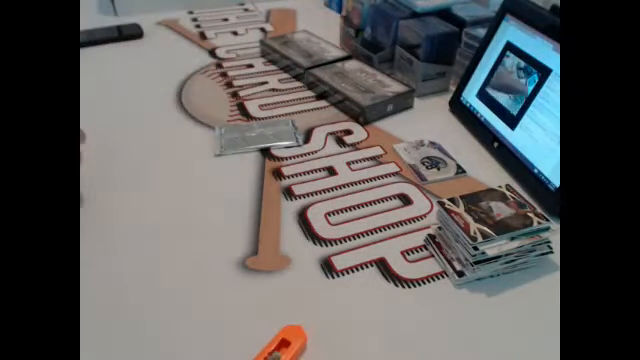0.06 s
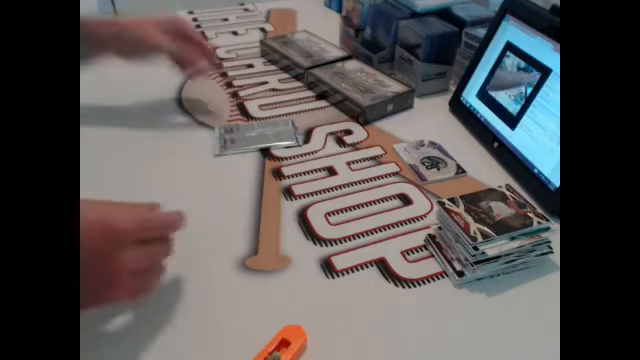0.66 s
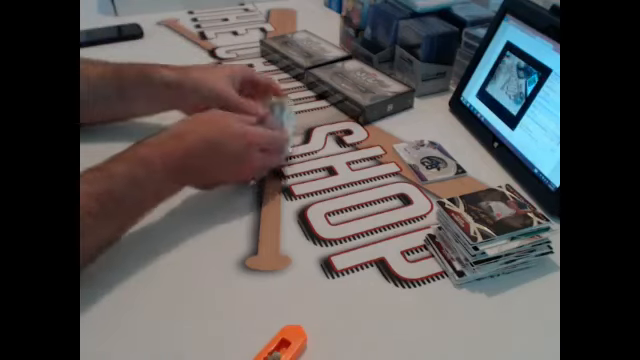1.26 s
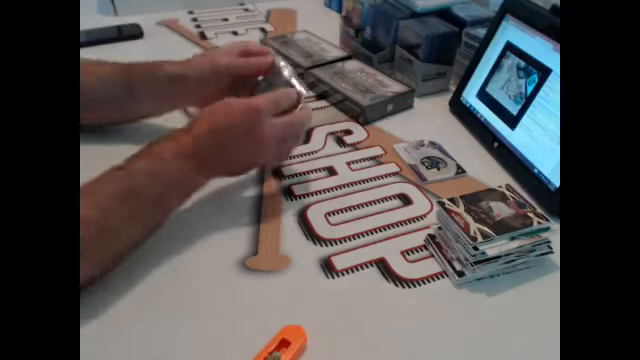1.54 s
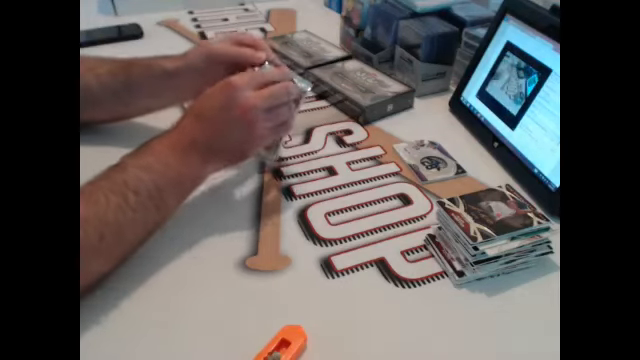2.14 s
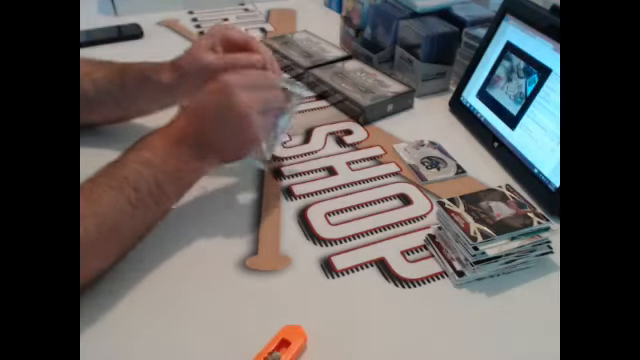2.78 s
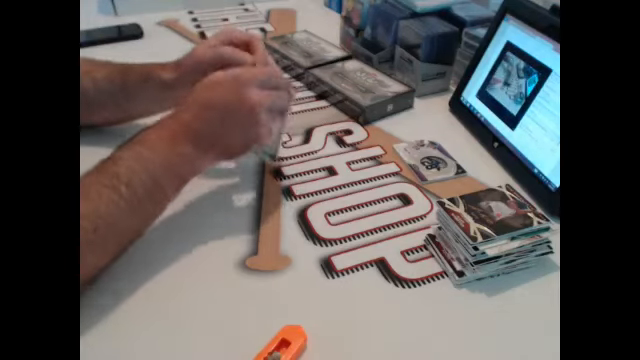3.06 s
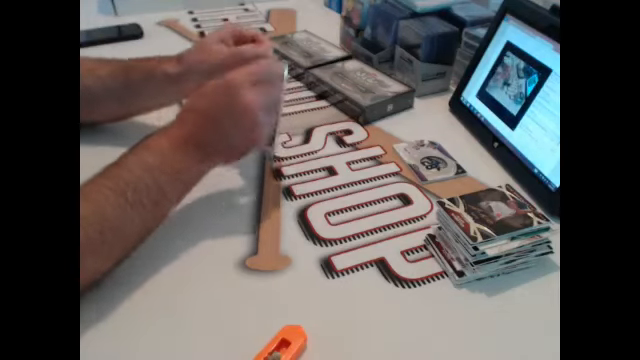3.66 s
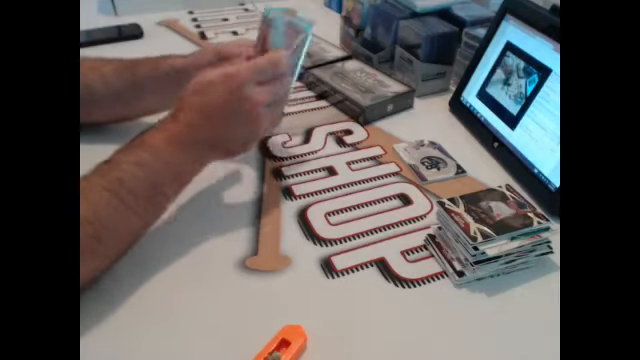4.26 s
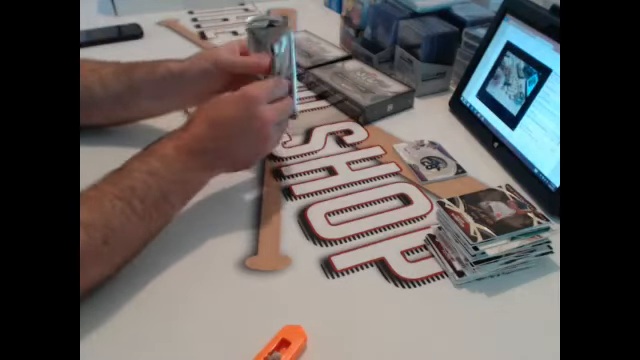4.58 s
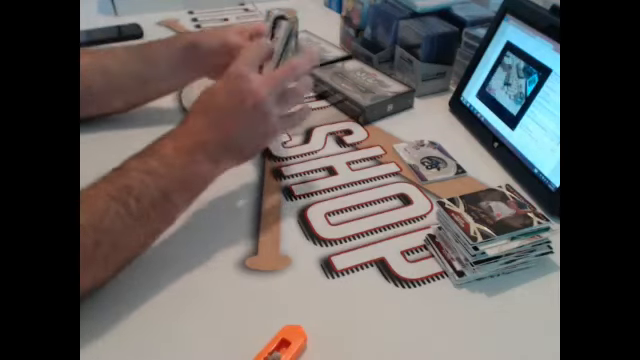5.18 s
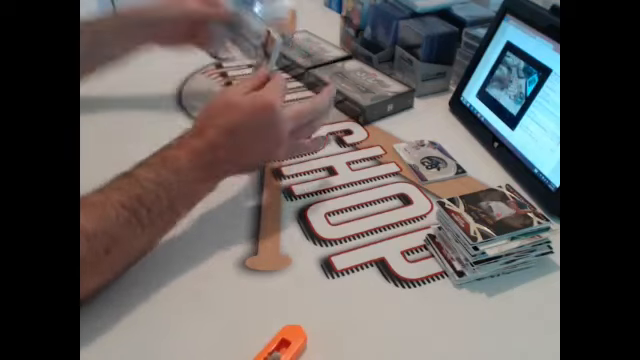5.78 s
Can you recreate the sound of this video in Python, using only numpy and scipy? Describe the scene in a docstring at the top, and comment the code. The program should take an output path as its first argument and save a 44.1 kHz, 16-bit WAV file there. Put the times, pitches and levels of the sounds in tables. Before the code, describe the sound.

At the very start, something lands a little way off with a loud, hollow knock that rattles and rebounds for about a third of a second. From 0.9 seconds, close to the microphone, hands pick up a foil card pack with faint ticks, crease snaps and muffled rubbing. Around 2.7 seconds comes a first short rip with sharper crackles, followed by scattered crinkling. The foil tears again from 3.6 seconds, and the seam opens with a sharp, hollow pop at about 3.8. Crisp snaps and crinkles thicken as the wrapper is peeled back, peaking near 5 seconds with another rip and a dull crunch as the pack buckles. A soft slide follows at about 5.6, then a few last light ticks. A low, steady fan with a faint thin whine runs throughout, and the small, bare room adds a short reverberation.

```python
"""A table in a small, bare room. A little way off, something lands with a hollow, rattling knock.
Up close, hands pick up a foil pack of trading cards, pinch it, tear the seam and peel off the wrapper.
Creases snap and ring, the foil crinkles and rubs on the cards, the seam rips in tiny slips and pops,
and the pack buckles with a dull crunch. A steady fan is the bed; a small desk microphone hears it all."""
import sys
import numpy as np
from scipy import signal
from scipy.fft import rfft, irfft
from scipy.io import wavfile

SR = 44100
rng = np.random.default_rng(int(sys.argv[2]) if len(sys.argv) > 2 else 0)


def inscribe(sig):
    """Save sig as 16-bit PCM at rate SR to the path in sys.argv[1].

    A 1-D sig is mono; a 2-D sig holds one channel per row.
    Samples are clipped to [-1, 1] before scaling.
    """
    pcm = np.round(np.clip(np.atleast_2d(sig).T, -1, 1) * 32767)
    wavfile.write(sys.argv[1], SR, pcm.astype(np.int16))


N = 261500

# creases snapping through: t/s, relative level/dB, ring f/Hz, rustle against the snap/dB
CREASE_SNAPS = [(0.8913, -33.5, 2580, -1.5), (0.9907, -37.5, 2250, -1.5), (1.2292, -41, 1620, -22),
                (1.352, -52, 3770, -2), (1.432, -44, 3900, -12), (1.763, -36.5, 3400, -6.5),
                (1.818, -43, 1810, -18), (1.948, -45.5, 4850, -13), (2.0249, -32, 4360, -3),
                (2.0891, -29, 3040, -1), (2.2756, -40, 3200, 1.5), (2.376, -41, 3700, -11),
                (2.4226, -36, 3390, -7.5), (2.5447, -41, 3280, -4), (2.6212, -37.5, 3450, -7),
                (2.658, -29, 4820, -18), (2.7281, -21, 7000, -12), (2.74, -28, 1920, -20),
                (2.7531, -23.5, 4900, -25), (2.781, -31.5, 1880, 3), (2.8011, -30, 3030, -10),
                (2.812, -29, 2270, -11), (2.8708, -38, 3020, -6), (3.0013, -36, 1270, -8),
                (3.0092, -37.5, 4400, 3), (3.042, -29, 3280, -3), (3.063, -28.5, 4350, -14),
                (3.1163, -28, 4100, -8), (3.208, -39, 3900, -3), (3.263, -39.5, 4570, -23),
                (3.3108, -39, 3870, -24), (3.418, -37, 3300, -5), (3.4607, -33.5, 4660, -7),
                (3.5076, -31, 2160, -3.5), (3.542, -28, 5400, -7), (3.5989, -25.5, 7100, -16),
                (3.6286, -32, 5000, -14), (3.663, -28.5, 2360, -4), (3.756, -28, 3040, 1),
                (3.78, -17, 3010, -10.5), (3.8243, -20, 4230, -21), (3.9562, -39, 4300, -10),
                (4.0009, -29.5, 3170, -16), (4.1392, -33.5, 5120, 1), (4.144, -26, 2210, -11),
                (4.249, -36, 7100, 5), (4.269, -28, 3780, -23), (4.3239, -36.5, 3330, -20),
                (4.3911, -28.5, 3000, -16), (4.424, -44, 6250, -16), (4.437, -32, 3430, -20),
                (4.471, -36, 2180, -16), (4.5052, -37.5, 4200, -17), (4.5391, -30.5, 2130, -10),
                (4.578, -26.5, 3230, -22), (4.5852, -25.5, 3290, -12), (4.615, -20, 3220, -7),
                (4.6228, -23, 3180, -19), (4.6584, -25.5, 4260, 0), (4.7171, -27, 1680, -3),
                (4.729, -20.5, 1720, -13), (4.7473, -21.5, 3300, -10), (4.8064, -40, 2820, -22),
                (4.8612, -27.5, 2470, 2), (4.9064, -22, 3240, -2), (4.9193, -28.5, 6900, -5),
                (4.9368, -27, 2220, -1), (4.963, -20, 6400, 4.5), (4.9788, -17.5, 2300, -9.5),
                (5.0048, -18, 5760, -5.5), (5.0979, -26, 3030, 1), (5.134, -39, 2480, -18),
                (5.2804, -28.5, 3400, -1), (5.3413, -33, 1620, -9), (5.3619, -27.5, 4420, -17),
                (5.5574, -37, 1350, -8), (5.656, -33.5, 1990, -17), (5.888, -42.5, 1690, -7),
                (5.912, -42, 2960, -5)]
# the foil's bright tone colour: f/Hz, level/dB
FOIL_EQ = [(180, -29), (300, -10), (402, -19.5), (469, -6), (511, -11.5), (777, -5), (1010, -10),
           (1590, -2), (2740, -5), (3190, -3), (3720, -6), (7090, -11.5), (8500, -22.5), (11000, -45),
           (18700, -120)]
# fingers squeezing or pulling the foil: t/s, length/s, relative crinkle level/dB, relative rub level/dB
SQUEEZES = [(0.915, 0.12, -49.5, -42), (1.139, 0.1, -50.5, -35), (1.274, 0.035, -50, -40),
            (1.722, 0.16, -52.5, -44), (1.991, 0.043, -38.5, -48), (2.714, .02, -27.5, -30),
            (2.743, .075, -28.5, -43), (2.83, 0.055, -35, -56), (2.999, 0.057, -44, -34.5),
            (3.187, .19, -48.5, -50), (3.44, 0.13, -44.5, -40), (3.64, 0.15, -25, -40),
            (3.7, 0.047, -23, -35.5), (3.79, .04, -29, -32), (3.947, .06, -40, -53),
            (4.104, .025, -39, -51), (4.135, 0.032, -34, -34.5), (4.237, 0.034, -36, -37),
            (4.388, 0.015, -26, -37), (4.43, 0.13, -41, -50), (4.548, 0.048, -31, -35.5),
            (4.608, 0.045, -30.5, -50), (4.704, 0.054, -26, -32.5), (4.76, .04, -38, -47),
            (4.858, 0.018, -40, -40), (4.893, .055, -30, -44), (4.953, 0.041, -24.5, -21),
            (5.023, 0.037, -42, -31.5), (5.1, .06, -49, -42), (5.259, 0.023, -33, -33),
            (5.563, .11, -43, -41.5)]
# foil rubbing on the cards, a muffled colour: f/Hz, level/dB
RUB_EQ = [(150, -22.5), (500, 6.0), (1100, 3.5), (1700, -5.0), (4000, -34.5)]
# the seam tearing and the wrapper sliding: t/s, length/s, relative level/dB, start f/Hz, end f/Hz
TEARS = [(2.735, 0.091, -38.5, 1870, 2060), (2.829, 0.082, -43, 2200, 2120), (3.645, 0.11, -39, 2450, 1900),
         (3.707, 0.062, -44, 1920, 1650), (4.707, .06, -39, 1660, 1600), (4.902, 0.059, -31.5, 2010, 1290),
         (5.545, 0.17, -45.5, 2200, 1920)]
# the whole pack flexing or bumping: t/s, relative level/dB, decay/s, ring f/Hz, ring against crunch/dB
PACK_FLEXES = [(0.892, -37, .008, 1200, 14.5), (2.727, -45, .02, 1250, -10), (3.045, -41, .014, 720, 5),
               (3.826, -42.5, 0.013, 1210, 22.5), (4.73, -40, 0.023, 1590, 8),
               (4.793, -39, 0.0071, 597, -9), (4.944, -33.5, 0.015, 1270, 13.5),
               (4.963, -17, 0.024, 734, 4), (4.967, -28.5, 0.027, 424, 10), (4.98, -23.5, 0.017, 720, 1.5),
               (5.002, -29, 0.021, 1200, 9), (5.064, -35.5, 0.015, 760, 6.5),
               (5.097, -29.5, 0.015, 1090, 1.5)]
# the colour of the pack's crunch: f/Hz, level/dB
CRUNCH_EQ = [(88, -49), (150, -13), (196, -18), (414, 7.5), (558, -14), (741, -1.5), (875, -31.5),
             (1220, -6), (2340, -3.5), (4040, -26), (6130, -7), (8000, -65), (10400, -70), (17600, -120)]
# the knock and its rebounds: t/s, relative level/dB, decay/s
KNOCK_HITS = [(0.0, -1.5, 0.0066), (0.0155, -7, 0.0072), (0.022, -9, 0.0098), (0.029, -13.5, 0.0043),
              (0.047, -17, 0.0078), (0.094, -19, 0.024), (0.15, -25, .012), (0.158, -17.5, 0.021),
              (0.19, -19.5, 0.02), (0.206, -16.5, 0.018), (0.222, -22.5, 0.022), (0.282, -34, 0.089)]
# modes of the hollow body that is struck: f/Hz, width/Hz, relative level/dB
BODY_MODES = [(161, 38, -1.5), (345, 89, -2), (515, 73, 0.5), (613, 110, -1), (720, 80, -2),
              (860, 107, -1.5), (1090, 225, -1.5), (1220, 186, -3.5), (1920, 450, -17)]
# the colour of the knock's contact noise: f/Hz, level/dB
CONTACT_EQ = [(50, -40.5), (95, -28), (140, -12.5), (185, -1), (250, -10.5), (380, -0.5), (540, 1),
              (760, -4.5), (1080, -5), (1600, -15.5), (2200, -19.5), (2900, -26.5), (7200, -38),
              (8600, -51)]
# the wash of fan air and room tone: f/Hz, level/dB
AIR_EQ = [(18, -59), (30, -18.5), (54, -17.5), (124, -4), (229, -2.5), (283, -4), (376, -7.5), (465, -7.5),
          (901, -11.5), (1040, -14.5), (2490, -26), (3230, -38), (4390, -34.5), (6550, -41.5), (8500, -54),
          (11000, -97), (18700, -120)]
# the fan's resonances: f/Hz, width per filter stage/Hz, level/dB
FAN_MODES = [(129.4, 8.7, -50.5), (289.2, 10.8, -54.5), (469.4, 9.6, -56)]
# the room's reverb time: f/Hz, T60/s
ROOM_T60 = [(120, 0.58), (500, 0.34), (2000, 0.34), (8000, 0.35)]


def snaps(burst_s=0.00041, damping=0.23, width_hz=1240, trail_s=0.011, swell_s=0.00097):
    """A crease snaps, rings its facet for a few cycles and trails off; returns (rings, cracks)."""
    rings, cracks, t = np.zeros(N), np.zeros(N), np.arange(SR // 10) / SR
    echo_s, echo_db = .0072, -21.5   # slapback from one hard surface nearby
    burst = t * np.exp(-t / burst_s)   # the crease gathers speed, then stops
    for s, db, hz, trail_db in CREASE_SNAPS:
        noise = rng.standard_normal((4, len(t)))
        flick = burst ** 2 * np.sin(2 * np.pi * hz * t + noise[0, 0])
        ring = match_energy(resonate(flick, hz, damping * hz))
        crack = from_db(-5.5) * match_energy(colour(noise[1] * burst, FOIL_EQ))
        for at, gain in [(s, from_db(db)), (s + echo_s, from_db(db + echo_db))]:
            add(rings, at, gain * ring)
            add(cracks, at, gain * crack)
        # three neighbouring creases slip around the snap, each at its own pitch
        for lag_s, slip_hz in rng.uniform([-.007, 1500], [.016, 6500], (3, 2)):
            slip = match_energy(resonate(noise[2] * burst, slip_hz, width_hz))
            add(cracks, s + lag_s, from_db(db - 11.5) * slip)
        shimmer = rms_one(resonate(noise[3], hz, width_hz))
        rustle = rms_one(colour(noise[2], FOIL_EQ) + from_db(-14) * shimmer)
        trail = np.exp(-t / trail_s) * (1 - np.exp(-t / swell_s))
        add(cracks, s, from_db(db + trail_db) * rustle * trail)
    return rings, cracks


def handling(pickup_s=0.81):
    """Foil crinkles under the fingers and rubs on the cards; even a light grip sets off lone ticks."""
    held = np.arange(N) / SR > pickup_s
    crinkle_power, rub_power = held * from_db(-61) ** 2, held * from_db(-47) ** 2   # resting grip
    for s, length, crinkle_db, rub_db in SQUEEZES:
        pressure = squeeze(length)
        add(crinkle_power, s, (from_db(crinkle_db) * pressure) ** 2)
        add(rub_power, s, (from_db(rub_db) * pressure) ** 2)
    crinkle_env, rub_env = np.sqrt(crinkle_power), np.sqrt(rub_power)
    tick_env = np.minimum(crinkle_env, from_db(-39))   # ticks stay small under a hard squeeze
    rub = rub_env * colour(rng.standard_normal(N), RUB_EQ)
    crinkle = crinkle_env * crackle(per_s=1000, spread_db=5, width_hz=900)
    ticks = tick_env * crackle(per_s=70, spread_db=3, width_hz=1300)
    return from_db(-6.5) * crinkle + from_db(-7) * ticks + from_db(-5.5) * rub


def squeeze(length, attack_s=0.0022, build_db=6.5, release_s=0.012):
    """Pressure of one squeeze: the fingers take hold, press harder and harder, then let go."""
    t = np.arange(SR // 2) / SR
    attack = 1 - np.exp(-t / attack_s)
    build = from_db(build_db * np.minimum(t / length - 1, 0))
    release = np.exp(-np.maximum(t - length, 0) / release_s)
    return attack * build * release


def crackle(per_s, spread_db, width_hz, facets=14):
    """Tiny creases give way at random, each ringing one facet of the foil; rms 1."""
    clicks = (rng.random(N) < per_s / SR) * rng.choice([-1, 1], N)
    clicks = clicks * from_db(spread_db * np.minimum(rng.exponential(1, N), 3))
    facet = rng.integers(0, facets, N)
    pitches_hz = np.linspace(900, 7800, facets)
    ringing = sum(resonate(clicks * (facet == k), hz, width_hz) for k, hz in enumerate(pitches_hz))
    return colour(ringing, FOIL_EQ)


def tears(slips_per_s=900, width_hz=480, trim_db=-1.5):
    """Rapid uneven slips ring the stretched wrapper, whose pitch glides as the free flap changes."""
    out, t = np.zeros(N), np.arange(SR // 4) / SR
    pole = np.exp(-np.pi * width_hz / SR)
    for s, length, db, start_hz, end_hz in TEARS:
        progress = np.minimum(t / length, 1)
        slips = (rng.random(len(t)) < slips_per_s / SR) * rng.standard_normal(len(t))
        glide_hz = start_hz + (end_hz - start_hz) * progress
        carrier = np.exp(2j * np.pi * np.cumsum(glide_hz) / SR)
        ring = np.imag(carrier * signal.lfilter([1], [1, -pole], slips / carrier))   # swept resonance
        arch = 2 * np.sqrt(progress * (1 - progress))
        add(out, s, from_db(db + trim_db) * arch * rms_one(ring))
    return out


def seam_pop(at_s=3.8243, hz=1200, level_db=-7.0, swell_s=0.00051):
    """The seam lets go and the taut wrapper springs open with a few cycles of a hollow note."""
    out, t = np.zeros(N), np.arange(SR // 20) / SR
    envelope = t / swell_s * np.exp(1 - t / swell_s)
    add(out, at_s, from_db(level_db) * envelope * np.sin(2 * np.pi * hz * t))
    return out


def flexes(trim_db=-3.5, damping=0.087):
    """The whole pack buckles with a dull crunch, and the bent wrapper rings like a hollow shell."""
    out, t = np.zeros(N), np.arange(SR // 4) / SR
    for s, db, decay_s, hz, ring_db in PACK_FLEXES:
        noise = rng.standard_normal((2, len(t)))
        ring = from_db(ring_db) * rms_one(resonate(noise[0], hz, damping * hz))
        crunch = colour(noise[1], CRUNCH_EQ)
        add(out, s, from_db(db + trim_db) * np.exp(-t / decay_s) * (crunch + ring))
    return out


def knock(body_db=-4.0, hardening=0.16):
    """Each hit is a short rattle that rings the hollow body; hard hits add more contact noise."""
    power, t = np.zeros(N), np.arange(SR // 2) / SR
    for s, db, decay_s in KNOCK_HITS:
        add(power, s, (from_db(db) * np.exp(-t / decay_s)) ** 2)
    force = np.sqrt(power)
    rattle = rng.standard_normal(N)
    body = hollow_body(force * rattle) / np.std(hollow_body(rattle))
    bite = (force / force.max()) ** hardening
    contact = force * bite * colour(rng.standard_normal(N), CONTACT_EQ)
    return from_db(body_db) * body + contact


def hollow_body(drive):
    """The struck body's modes ring together, in alternating polarity."""
    return sum((-1) ** k * from_db(db) * resonate(drive, hz, width)
               for k, (hz, width, db) in enumerate(BODY_MODES))


def fan(air_db=-42.5, whine_hz=1063, swell_at_s=1.8, swell_s=.4):
    """A bed of moving air with a few narrow resonances and a thin whine that swells once."""
    def tone(hz, width):
        return rms_one(resonate(resonate(rng.standard_normal(N), hz, width), hz, width))
    drone = sum(from_db(db) * tone(hz, width) for hz, width, db in FAN_MODES)
    swell = np.exp(-.5 * ((np.arange(N) / SR - swell_at_s) / swell_s) ** 2)
    whine = from_db(-61 + 8.5 * swell) * tone(whine_hz, width=12)
    air = from_db(air_db) * colour(rng.standard_normal(N), AIR_EQ)
    return air + drone + whine


def room(send, predelay_s=0.0041, octaves=8):
    """Diffuse reflections off bare walls, octave by octave; the bass hangs on longest."""
    t, tail = np.arange(SR * 3 // 4) / SR, 0
    for low_hz in 50 * 2 ** np.arange(octaves):
        bandpass = signal.butter(2, [low_hz, 2 * low_hz], "band", fs=SR, output="sos")
        band = signal.sosfilt(bandpass, rng.standard_normal(len(t)))
        t60 = at_hz(ROOM_T60, low_hz * np.sqrt(2))
        tail = tail + band * 1000 ** (-t / t60)
    tail = tail * (t > predelay_s)
    return signal.fftconvolve(send, tail / np.sqrt(np.sum(tail ** 2)))[:N]


def from_db(db):
    return 10 ** (np.asarray(db) / 20)


def rms_one(x):
    return x / np.sqrt(np.mean(x ** 2) + 1e-20)


def match_energy(x):
    """Give a transient the energy of 2.5 ms at rms 1."""
    return x / np.sqrt(np.sum(x ** 2) / (SR / 400))


def at_hz(curve, hz):
    """Read a curve along a log frequency axis."""
    freqs, values = np.array(curve).T
    return np.interp(np.log(hz + 1), np.log(freqs), values)


def add(track, s, sound):
    """Mix a sound in from time s on."""
    i = int(np.clip(s * SR, 0, N - 1))
    track[i:i + len(sound)] += sound[:N - i]


def colour(x, eq, size=2048):
    """Minimum-phase EQ, so attacks stay crisp; rms 1."""
    gains = from_db(at_hz(eq, np.fft.rfftfreq(size, 1 / SR)))
    cepstrum = irfft(np.log(gains))
    cepstrum[1:size // 2] *= 2
    cepstrum[size // 2 + 1:] = 0
    impulse = irfft(np.exp(rfft(cepstrum)))
    return rms_one(signal.fftconvolve(x, impulse)[:len(x)])


def resonate(x, hz, width_hz):
    """One resonance with unity gain at its peak."""
    r = np.exp(-np.pi * width_hz / SR)
    feedback = [1, -2 * r * np.cos(2 * np.pi * hz / SR), r * r]
    return signal.lfilter(np.array([1, 0, -1]) * (1 - r * r) / 2, feedback, x + 1e-18)


def scene():
    """Far knock and near foil share one room; flat facets beam their ring straight at the microphone."""
    rings, cracks = snaps()
    far = knock()
    near = cracks + handling() + tears() + seam_pop() + flexes()
    pouch = resonate(near, hz=2300, width_hz=700)   # the hollow wrapper radiates all around
    send = from_db(-5.5) * far + from_db(-12) * near + from_db(-17) * rings + from_db(-9.5) * pouch
    return (far + near + from_db(-1) * rings + room(send) + fan())[None]


def record(dry, rolloff_hz=7600, cutoff_hz=8700):
    """The microphone rounds the highest peaks and loses the top of the treble."""
    rolloff = signal.butter(10, rolloff_hz, fs=SR, output="sos")
    cutoff = signal.ellip(10, .3, 80, cutoff_hz, fs=SR, output="sos")
    return signal.sosfilt(cutoff, signal.sosfilt(rolloff, np.tanh(dry)))


dry = scene()
out = record(dry)
inscribe(out)
```